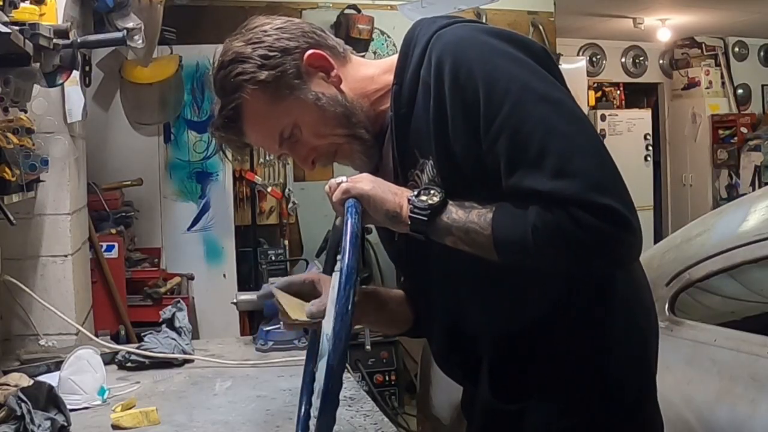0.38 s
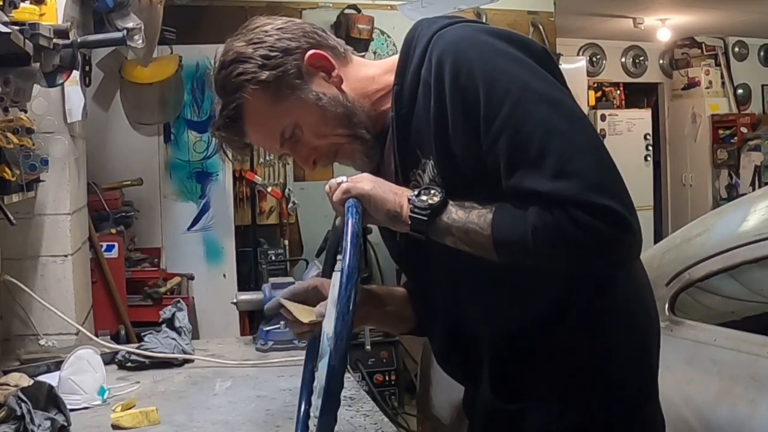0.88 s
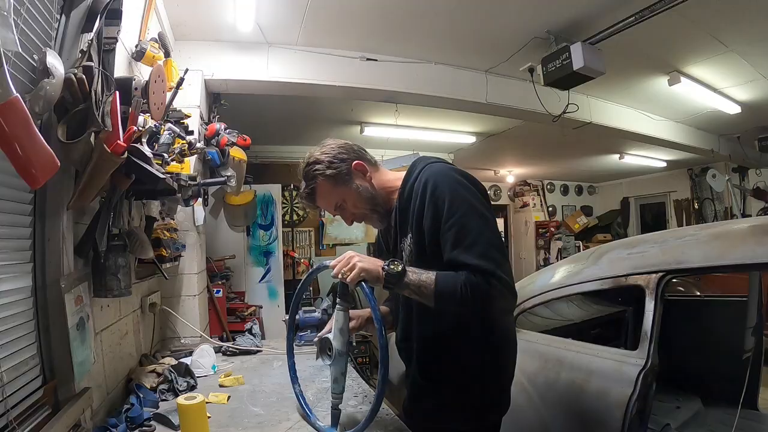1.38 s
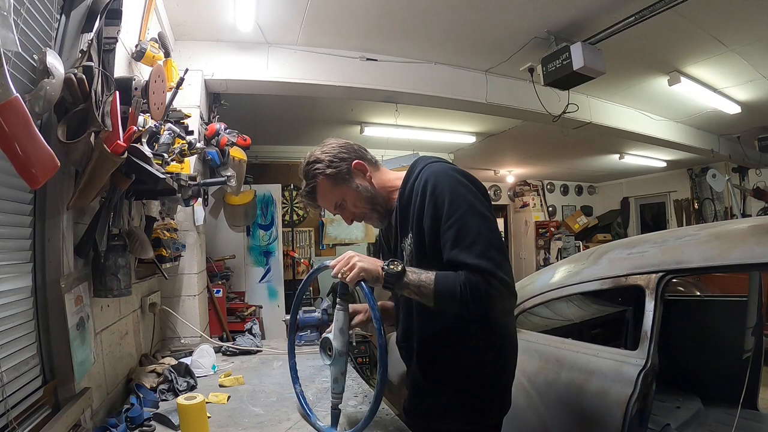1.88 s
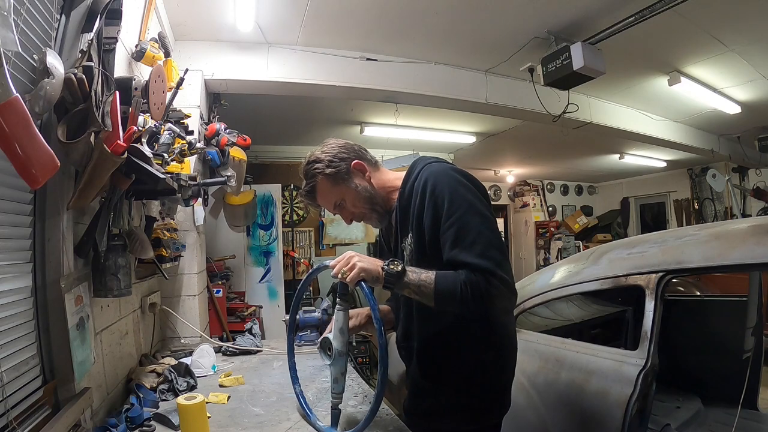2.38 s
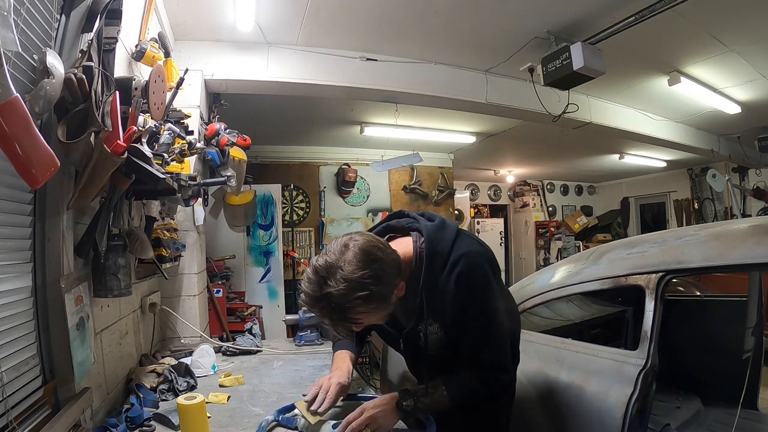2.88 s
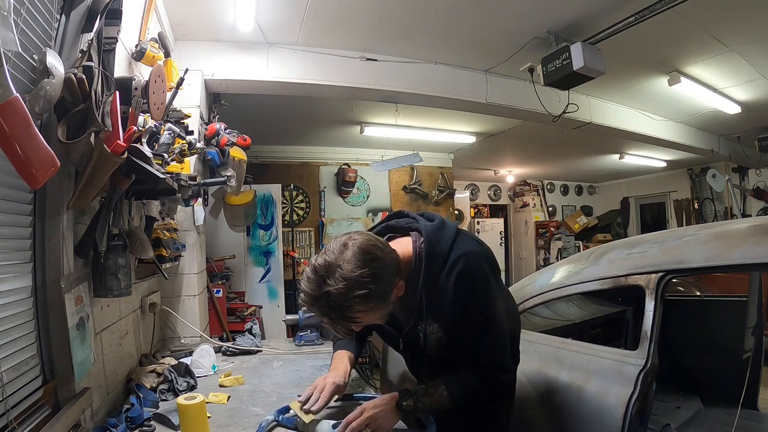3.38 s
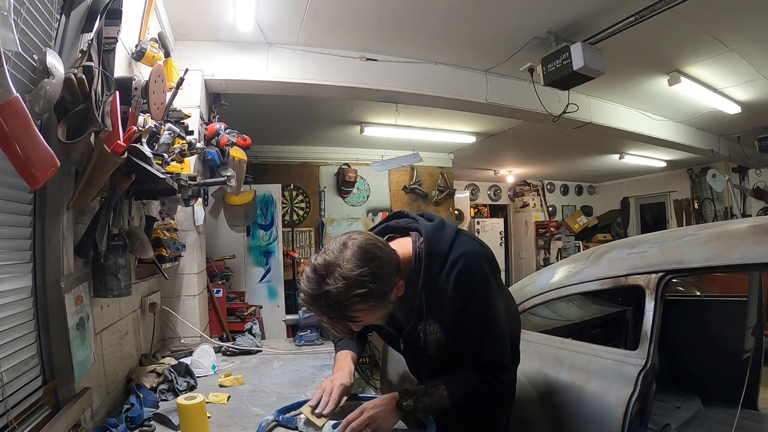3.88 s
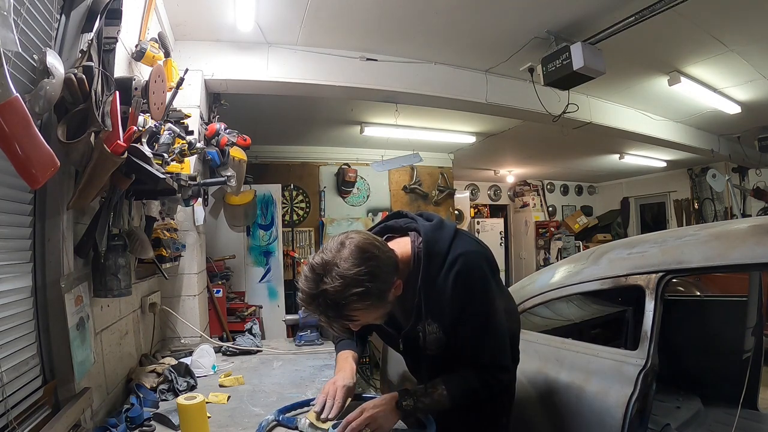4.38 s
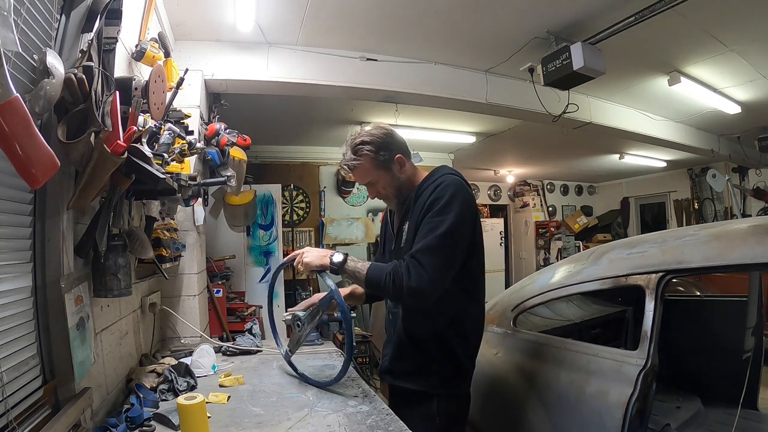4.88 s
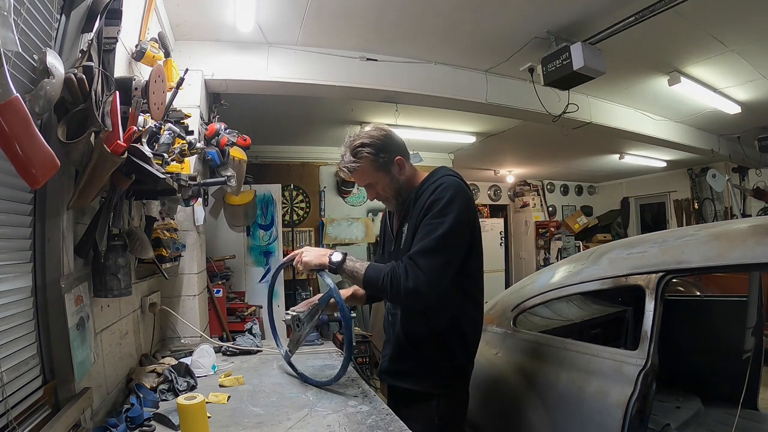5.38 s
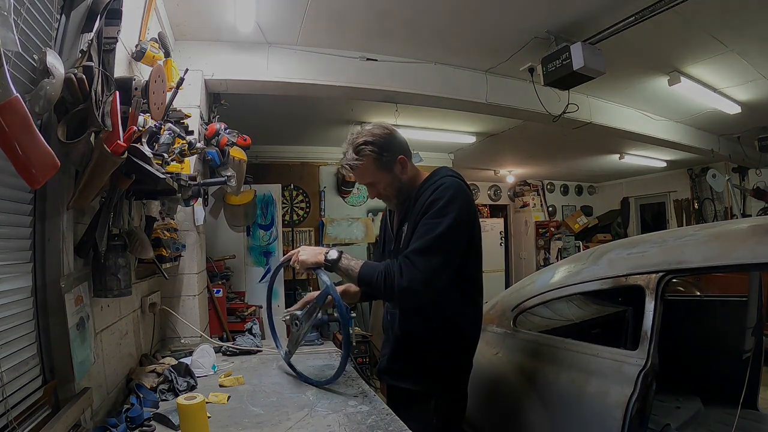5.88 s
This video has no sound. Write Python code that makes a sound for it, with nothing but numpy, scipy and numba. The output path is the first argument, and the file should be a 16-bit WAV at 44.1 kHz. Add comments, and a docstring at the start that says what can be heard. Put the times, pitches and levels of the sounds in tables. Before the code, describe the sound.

A hand rubs folded sandpaper along a hard rim: slow swelling rasps with sharp lift-offs, a burst of rapid scrubbing, evenly spaced single swipes with small gaps, then steady brisk strokes to the end. The paper's curl adds a papery whistling edge, and the wheel knocks softly. Nearby stereo microphone, small hard garage with short reverberation and quiet electrical rumble.

```python
"""Hand sanding of a painted steering-wheel rim: four passages of pulls or scrubs, spliced end to end.
Dense grains of noise stand for grit scratching paint; they ring paper, rim and bench, differently in each grip.
A curl of paper adds a gliding ring, and dull bumps are swells of low-ringing noise.
The garage answers with a short tail of decaying noise, over a low rumble of filtered noise and mains hum.
A two-port microphone listens nearby."""
import sys
import numpy as np
from scipy import signal
from scipy.fft import rfft, irfft
from scipy.io import wavfile
from scipy.ndimage import uniform_filter1d
from numba import njit

SR = 44100
rng = np.random.default_rng(int(sys.argv[2]) if len(sys.argv) > 2 else 0)


def to_linear_factor(level_db):
    """Convert decibel levels (scalar or array-like) to linear amplitude factors."""
    exponent = np.asarray(level_db, float) / 20
    return 10 ** exponent


def store_wav(level_fs):
    """Save 16-bit WAV to argv[1]."""
    pcm = np.round(np.clip(np.atleast_2d(level_fs), -1, 1) * 32767)
    wavfile.write(sys.argv[1], SR, pcm.T.astype(np.int16))


N = 265482
TIME = np.arange(N) / SR
SIZE = 8192  # filter length in samples
GRID_HZ = np.maximum(np.fft.rfftfreq(SIZE, 1 / SR), 1)

# edges of the four passages: time_s
SPLICES_S = [0, 1.352, 2.521, 4.62, 6.03]


def unit(x):
    """Scale to rms 1."""
    return x / np.sqrt(np.mean(x ** 2))


def read(table, hz=GRID_HZ):
    """Read a (frequency, value) table on a log-frequency axis."""
    table_hz, value = np.transpose(table)
    return np.interp(np.log(hz), np.log(table_hz), value)


def modes(table):
    """Power of steep resonances (hz, width_hz, peak_db), added together."""
    return sum(to_linear_factor(db) ** 2 / (1 + (2 * (GRID_HZ - hz) / width) ** 2) ** 2 for hz, width, db in table)


def colour(x, power):
    """Causal minimum-phase filter with the given power response, folded from its cepstrum."""
    cepstrum = irfft(np.log(power + 1e-16) / 2)
    cepstrum[1:SIZE // 2] *= 2
    cepstrum[SIZE // 2 + 1:] = 0
    response = irfft(np.exp(rfft(cepstrum)))
    return signal.fftconvolve(x, response)[:len(x)]


def walk(rate):
    """Random levels held 1 / rate s and slewed twice; rms 1."""
    hold = int(SR / rate)
    steps = np.repeat(rng.standard_normal(N // hold + 1), hold)
    return unit(uniform_filter1d(uniform_filter1d(steps, hold), hold)[:N])


def pair(same, size):
    """Left and right noise, alike by the given share at each frequency."""
    same = np.clip(same, 0, .999)
    mid = colour(rng.standard_normal(size), (1 + same) / 2)
    side = colour(rng.standard_normal(size), (1 - same) / 2)
    return np.array([mid + side, mid - side])


def rumble():
    """Low noise of the building with a wavering hum; a clean tone about an octave above beats slowly."""
    # spectrum of the building noise, relative: frequency_hz, density_db
    building = [(20, -17), (35, -10.5), (75, -12), (130, -10.5), (200, -6), (270, -21), (400, -21),
                (580, -30), (900, -29.5), (1900, -32), (7000, -46), (10000, -53.5), (15000, -58)]
    # level of noise and hum together: time_s, level_db
    level_db = [(0, -61.5), (.7, -62.5), (1.2, -61), (2.1, -60), (2.6, -61.5), (3.4, -62.5), (4.25, -61.5),
                (5.0, -63), (5.4, -56), (5.65, -62.5), (6.02, -73.5)]
    # mains hum, on the scale of the building noise: frequency_hz, width_hz, peak_db
    hum_lines = [(47.1, 6.3, 3)]
    waver_db = 3
    throb_hz, throb_db = 99, -5  # amplitude over the rumble, averaged over the beat
    beat_hz, beat_peak_s = 1.88, 3.2  # two motors a little out of step

    likeness = read([(60, 1.0), (130, 0.33), (300, 0.066), (2000, 0.12)])  # frequency_hz, share 0-1
    noise = pair(likeness, N)
    low = np.array([colour(channel, to_linear_factor(read(building)) ** 2) for channel in noise])
    hum = sum(to_linear_factor(waver_db * walk(3.3)) * colour(rng.standard_normal(N), modes([line])) for line in hum_lines)

    beat = 2 * np.cos(np.pi * beat_hz * (TIME - beat_peak_s)) ** 2
    pitch_hz = throb_hz * (1 + .006 * walk(4.05))
    tone = np.sin(2 * np.pi * np.cumsum(pitch_hz) / SR)
    throb = to_linear_factor(throb_db + waver_db * walk(2.545)) * beat * tone
    return (unit(low + hum) + throb) * to_linear_factor(np.interp(TIME, *np.transpose(level_db)))


def garage(x):
    """Diffuse tail: stereo noise whose bands each die at their own pace, convolved with the sound."""
    # time to fall by 60 dB: frequency_hz, decay_s
    decay = [(150, 0.79), (1000, 0.3), (4000, 0.44), (10000, 0.29), (16000, 0.081)]
    # likeness of left and right: frequency_hz, share 0-1
    likeness = [(100, 0.94), (1000, 0.88), (4000, 0.23), (9000, 0)]
    size = int(.6 * SR)
    hz, t, bands = signal.stft(pair(read(likeness), size), SR, nperseg=256)
    bands = bands * to_linear_factor(-60 * t / read(decay, np.maximum(hz, 1))[:, None])
    bands = bands * (hz / np.hypot(hz, 500))[:, None]  # door and thin walls let the bass out
    tail = signal.istft(bands, SR, nperseg=256)[1][:, :size]
    tail = tail * np.clip(np.arange(size) / SR / 0.0067, 0, 1)  # the first walls answer after a few ms
    tail = tail / np.sqrt(np.sum(tail ** 2) / 2)
    return np.array([signal.fftconvolve(x, channel)[:len(x)] for channel in tail])


def bumps():
    """The wheel shifts on its support: each bump is a short swell of noise in one low ring."""
    # dull bumps: centre_s, half_width_s (to 1/e), pitch_hz, level_db
    bump_rows = [(0.224, 0.016, 187, -51), (1.525, .04, 139, -54.5), (2.084, .035, 135, -50.5),
                 (2.173, 0.048, 140, -51), (2.37, 0.029, 150, -52), (3.18, .03, 275, -63),
                 (3.765, 0.085, 171, -64.5), (5.5, 0.047, 169, -62.5)]
    out = 0
    for centre, half_width, hz, db in bump_rows:
        swell = np.exp(-((TIME - centre) / half_width) ** 2)
        ring = unit(colour(rng.standard_normal(N), modes([(hz, hz / 3, 0)])))
        out = out + to_linear_factor(db) * swell * ring
    return out


def pull(start, grip_s, flick, flick_s, opening, closing, flick_db, way):
    """Contact, a long swelling drag, then a flick off the rim that falls away as the paper lifts."""
    # all tables here: one entry or row for the rim held upright, one for the rim flat on the bench
    # first contact under the opening level, for an instant grip: level_db
    touch_db = [-8, -6.5]
    # swell in the pull: level_db, then its place as a share of the pull
    bulge_db = [-0.2, 1.5]
    bulge_at = [1, 0.85]
    # lifting and lift-off under the peak of the flick: level_db
    lift_db = [-5, -10.5]
    off_db = [-29, -24]
    # fine grit, pressure on the rim and load on the spokes, relative, with the columns
    # contact_db, grip_db, swell_db, closing_db, flick_db, lifting_db, off_db
    fine_db = [
        [1, 0.91, 1, 0.64, -0.5, 4.3, 3.8],
        [0.61, -1.1, 0.58, -1.9, -2, 2, 3],
    ]
    press_db = [
        [4, 0, 2, 3.4, -5, -28, -8],
        [5, -4.5, 0, 7.1, 0.5, -7, 1.5],
    ]
    load_db = [
        [4, 3.5, 2.5, 3.5, -12, -19, -1],
        [6, 3.5, -3, 5, -8, -5, 1.5],
    ]
    flick_peak_at, lift_at = 0.63, 0.81  # shares of the flick
    slow_start_s = 0.065

    grip, close = start + grip_s, flick - flick_peak_at * flick_s
    bulge = grip + bulge_at[way] * (close - grip)
    times = [start, grip, bulge, close, flick, close + lift_at * flick_s, close + flick_s]

    touch = opening + touch_db[way] * (1 + grip_s / slow_start_s)  # a slow start sets out from fainter contact
    swell = opening + bulge_at[way] * (closing - opening) + bulge_db[way]
    effort = [touch, opening, swell, closing, flick_db, flick_db + lift_db[way], flick_db + off_db[way]]
    return times, effort, fine_db[way], press_db[way], load_db[way]


def scrub(start, grip_s, turn, peak, sag, press, load, end, next_turn, way):
    """Bites after the turn, changes level and grit as it eases off, then leads into the next turn."""
    # all tables here: one entry or row for short hard rubbing, one for loose rubbing
    # fine grit, relative: full_grip_db, easing_off_db
    fine_db = [
        [-1.7, 2.6],
        [0.8, 0.64],
    ]
    # where the stroke eases off: share of the stroke
    ease_at = [0.78, 0.72]
    # fine grit at a level turn: relative_db; then its change for each dB from peak to turn: db_per_db
    turn_fine_db = [-1, 0.5]
    turn_dulls = [0.17, 0.27]

    def dull(dip_db):
        return turn_fine_db[way] + turn_dulls[way] * dip_db

    times = [start, start + grip_s, start + ease_at[way] * (end - start), end]
    effort = [turn, peak, peak + sag, next_turn]
    fine = [dull(turn - peak), *fine_db[way], dull(next_turn - peak - sag)]
    return times, effort, fine, np.full(len(times), press), np.full(len(times), load)


def hand(take):
    """Effort, fine-grit share, rim pressure and spoke load over time; the shares lie about 1."""
    # long pulls ending in a flick off the rim; levels are of the effort:
    # start_s, time_to_grip_s, flick_peak_s, flick_length_s, opening_db, closing_db, flick_db
    pull_rows = [(-0.1, 0.02, 0.022, 0.029, -26, -58.5, -60), (0.228, 0.073, 0.5, 0.07, -44, -43, -32),
                 (0.818, 0.0063, 1.179, 0.065, -52.5, -43.5, -35),
                 (2.632, 0.016, 2.905, 0.037, -45, -46, -35),
                 (3.154, 0.0064, 3.423, 0.044, -45.5, -45.5, -35.5),
                 (3.71, 0.013, 3.984, 0.039, -45.5, -46, -38.5),
                 (4.238, 0.032, 4.53, 0.092, -43, -48, -42.5)]
    # quick strokes to and fro, each ending where the next turns; pressure and load are relative:
    # start_s, time_to_grip_s, turn_db, peak_db, sag_db, pressure_db, load_db
    scrub_rows = [(1.352, 0.0048, -37.5, -38.5, -5.5, -2, -4.5), (1.459, .005, -50, -40.5, -4, 1.5, -6.5),
                  (1.58, 0.062, -42.5, -41, -1.5, -1.5, -0.5), (1.751, 0.0064, -43.5, -43.5, 0, 0.5, 4),
                  (1.884, 0.014, -45.5, -42, -2.5, -2, 1.5), (2.043, 0.015, -66, -39.5, -5.5, 2, -1),
                  (2.184, 0.015, -52, -43.5, 0, -0.5, 1.5), (2.342, 0.0089, -67, -42, -3.5, 2, 0),
                  (2.483, 0.025, -49.5, -42.5, -15, 2.5, 2.5), (4.619, 0.062, -42, -40.5, 1, -2, 1),
                  (4.778, 0.037, -47, -38.5, -3.5, 7, 3), (4.941, 0.075, -46, -39, -4.5, 3.5, -1),
                  (5.099, .075, -43, -38.5, -3.5, 3.5, -4.5), (5.298, 0.053, -49, -40, 0, -3, -8),
                  (5.441, 0.039, -45.5, -40, -3, -3, 7), (5.59, 0.02, -48, -44.5, -1.5, -3, -2.5),
                  (5.77, 0.047, -48, -44.5, -9.5, -1, 0)]
    # the paper scuffs briefly as it lands or snags: time_s, level_db
    scuff_rows = [(0.209, -58), (0.241, -66), (0.831, -44), (2.642, -74), (3.192, -43.5), (4.291, -42)]
    scuff_s = 0.003  # half width to 1/e
    scrub_s = 0.17  # shortest length of the last scrub of a passage; a splice may cut it
    fade_out_db = -60  # where the last stroke dies away

    way = take // 2  # two passages with each way of holding the rim
    begin, end = SPLICES_S[take] - (take == 0), SPLICES_S[take + 1]
    strokes = [pull(*row, way) for row in pull_rows if begin - .01 <= row[0] < end - .01]
    rows = [row for row in scrub_rows if begin - .01 <= row[0] < end - .01]
    if rows:
        ends = [row[0] for row in rows[1:]] + [max(end, rows[-1][0] + scrub_s)]
        last_turn = rows[-1][2] if end < TIME[-1] else fade_out_db
        turns = [row[2] for row in rows[1:]] + [last_turn]
        strokes += [scrub(*row, stop, turn, way) for row, stop, turn in zip(rows, ends, turns)]

    curves = np.zeros((4, N))  # silent between strokes
    for times, *columns in strokes:
        on = (TIME >= times[0]) & (TIME <= times[-1])
        curves[:, on] = [to_linear_factor(np.interp(TIME[on], times, db)) for db in columns]
    effort, fine, press, load = curves

    def about_one(share):
        return share / np.sqrt(np.sum((effort * share) ** 2) / np.sum(effort ** 2))

    scuffs = sum(to_linear_factor(db) * np.exp(-((TIME - s) / scuff_s) ** 2) for s, db in scuff_rows)
    total = effort + scuffs
    on_rim = effort / (total + 1e-9)  # a scuff skims the paint without loading the rim
    smooth = uniform_filter1d(total, size=120)
    return smooth, about_one(fine), about_one(press) * on_rim, about_one(load) * on_rim


@njit
def gliding_ring(x, hz, width):
    """State-variable band-pass whose centre moves sample by sample, gain 1 at the centre."""
    y, band, low = np.empty(len(x)), 0., 0.
    for i in range(len(x)):
        g, damping = np.tan(np.pi * hz[i] / SR), width / hz[i]
        v = (band + g * (x[i] - low)) / (1 + g * (g + damping))
        band, low, y[i] = 2 * v - band, low + 2 * g * v, damping * v
    return y


def curl(grains, take, span):
    """The curl of paper under the fingers rings at a pitch that follows its free length."""
    # glide of the ring; the level is over the effort: time_s, pitch_hz, level_db
    glide = [(0.46, 2670, -26), (0.53, 3360, -23), (1.1, 2800, -25), (1.19, 3260, 8.5), (1.36, 2870, -1.5),
             (2.502, 2800, -1), (2.66, 4550, 2), (2.75, 3380, -3), (2.82, 4480, 2), (2.92, 3250, -6),
             (3.19, 4770, 3), (3.25, 2700, -11), (3.35, 3460, 4), (3.429, 3300, 2), (3.73, 3450, -17),
             (3.8, 3460, 2), (3.9, 4900, -2), (3.979, 3200, 6), (4.3, 3040, -3), (4.42, 5050, -9),
             (4.52, 3480, 6.5), (4.698, 4800, 1), (4.86, 3370, 0), (5.0, 2970, -17), (5.2, 3420, 2),
             (5.3, 2980, -11), (5.37, 4240, -1), (5.5, 3300, -7), (5.68, 4330, -4), (5.85, 3570, -5)]
    # width of each of the two filter passes, one entry a passage: width_hz
    curl_width = [705, 604, 800, 870]
    s, hz, db = np.transpose(glide)
    hz, width = np.interp(TIME[span], s, hz), 1. * curl_width[take]
    driven = grains * to_linear_factor(np.interp(TIME[span], s, db))
    return gliding_ring(gliding_ring(driven, hz, width), hz, width)


def sanding(take, span):
    """Grains of uneven size, catching in patches, scratch the paint and ring paper and rim."""
    # broad colour of the scratch: frequency_hz, then one row a passage of relative density_db
    grit_hz = [480, 750, 1000, 1400, 2000, 3000, 4500, 6000, 8000, 10000, 12500, 15000]
    grit_db = [
        [-23, -40.5, -16.5, -10.5, -3.5, -12, -10, -5.5, -16, -27.5, -36.5, -48],
        [-16, -39.5, -22.5, -13, -11, -6, -6, -1.5, -10.5, -22.5, -28.5, -43],
        [-14.5, -27.5, -18, -12, -8, -6, 0, 5.5, -7, -18, -27.5, -41],
        [-19.5, -15.5, -12, 0, 1, 1, 3.5, 10, -1.5, -11.5, -20, -32],
    ]
    # rings of the rim, driven by pressure or load, one list a passage: pitch_hz, width_hz, peak_db
    rim = [
        [(169, 25.4, 10), (223.6, 14.6, 2), (345, 100, -17), (1137, 174, -16), (1735, 50, -6.5),
         (1898, 150, -1.5), (2096, 87, -4)],
        [(150, 31, -6.5), (230.3, 12.7, 3.5), (343, 69, 2.5), (429, 58, -10.5), (2740, 250, -4.5),
         (3030, 530, -4.5)],
        [(201, 120, -6), (302.5, 73, -10), (1176, 196, -0.5)],
        [(167.6, 39, 2.5), (331.6, 62, 1.5), (1473, 240, -3), (2056, 94, 4)],
    ]
    # rings of the folded paper, one list a passage: pitch_hz, width_hz, peak_db
    paper = [
        [(3190, 910, -17.5)],
        [(1848, 60.6, -8)],
        [(2390, 120, -8.5), (3040, 180, -8.5), (3340, 1320, -9.5), (5990, 290, -3.5)],
        [(3550, 3000, -9), (2266, 75, -3), (3800, 72, 0), (4400, 110, -5), (5070, 110, -3)],
    ]
    # how far each ring swells and sinks, one entry a passage: rms_db
    drift_db = [1.2, .7, 1.8, 2.5]
    scatter_db, catch_db, snap_db = 1.24, 1.0, 2.5  # uneven grains, patches, grains tearing loose
    split_hz, top_hz, top_power = 5500, 10500, 2.2
    spokes_under_hz = 600

    effort, fine, press, load = (curve[span] for curve in hand(take))
    uneven = to_linear_factor(scatter_db * rng.exponential(size=N) + catch_db * walk(90))
    grains = effort * unit(rng.standard_normal(N) * uneven)[span]

    broad = to_linear_factor(read(np.transpose([grit_hz, grit_db[take]]))) ** 2 / (1 + (350 / GRID_HZ) ** 6)
    coarse, middle = (1 / (1 + (GRID_HZ / hz) ** 6) for hz in (split_hz, top_hz))
    # the fine share brings the fine grit forward, the finest most of all
    scratch = colour(grains, broad * coarse) + colour(grains * fine, broad * (1 - coarse) * middle)
    # single grains tearing loose tick in the top
    snaps = unit(to_linear_factor(snap_db * rng.exponential(size=N)))[span]
    scratch = scratch + colour(grains * snaps * fine ** top_power, broad * (1 - middle))

    rings = [(load if mode[0] < spokes_under_hz else press, mode) for mode in rim[take]]
    rings += [(1, mode) for mode in paper[take]]
    for share, mode in rings:
        # the contact wanders along the rim, so every ring swells and sinks on its own
        drift = to_linear_factor(drift_db[take] * walk(10)[span])
        scratch = scratch + colour(grains * share * drift, modes([mode]))

    # the nominal power below the split sets the scale
    scale = np.sqrt(np.mean((broad + modes(rim[take] + paper[take])) * (GRID_HZ < split_hz)))
    return curl(grains, take, span) + scratch / scale


def ports(near, far):
    """The two microphone ports share most of the bass; in the treble each faces its own edge of the paper."""
    # level difference: frequency_hz, left_minus_right_db
    balance = [(100, -3), (300, -0.5), (700, 0), (1300, 0), (2400, 5), (4400, 3), (6500, 4.5), (9000, -4),
               (14000, -4.5)]
    # likeness of left and right: frequency_hz, share 0-1
    likeness = [(300, 0.91), (1000, 0.8), (2000, 1), (4000, 0.75), (8000, 0.83), (13000, 0.23)]
    same = np.clip(read(likeness), 0, .999)
    mid, side = colour(near, (1 + same) / 2), colour(far, (1 - same) / 2)
    tilt = read(balance)
    # power responses, so each port takes half the difference
    return np.array([colour(mid + side, to_linear_factor(tilt)), colour(mid - side, to_linear_factor(-tilt))])


def scene():
    """Each passage sounds with its own tail and is cut off at the next splice."""
    # garage tail beside the direct sound, one entry a passage: level_db
    tail_db = [-7.5, -7.5, -6, -8]
    out = rumble() + bumps()
    for take, db in enumerate(tail_db):
        span = (TIME >= SPLICES_S[take]) & (TIME < SPLICES_S[take + 1])
        near, far = sanding(take, span), sanding(take, span)
        out[:, span] += ports(near, far) + to_linear_factor(db) * garage(near)
    return out


def low_pass(x):
    """Removes everything above the highest recorded frequency."""
    return signal.sosfilt(signal.butter(12, 15640, fs=SR, output="sos"), x)


def record(dry):
    """Takes the finished stereo mix to its delivered form."""
    return low_pass(dry)


dry = scene()
out = record(dry)
store_wav(out)
```